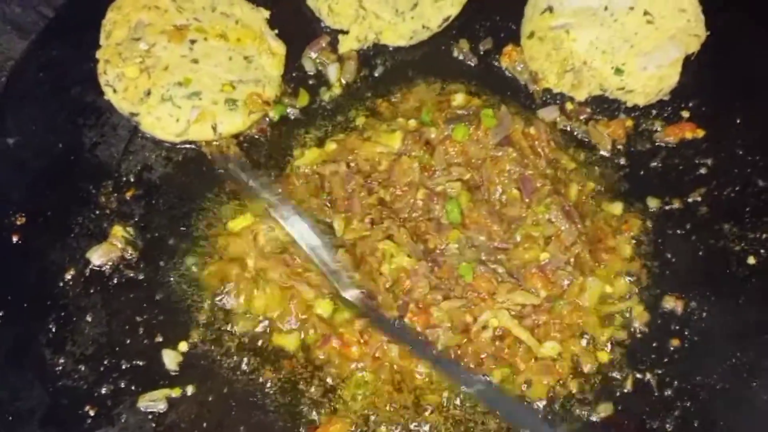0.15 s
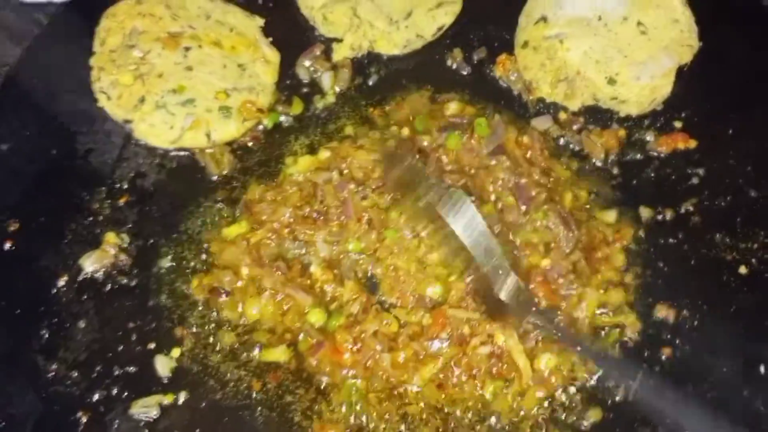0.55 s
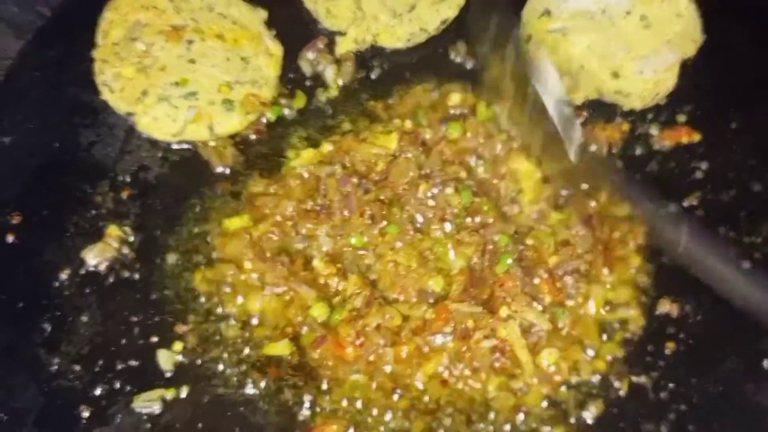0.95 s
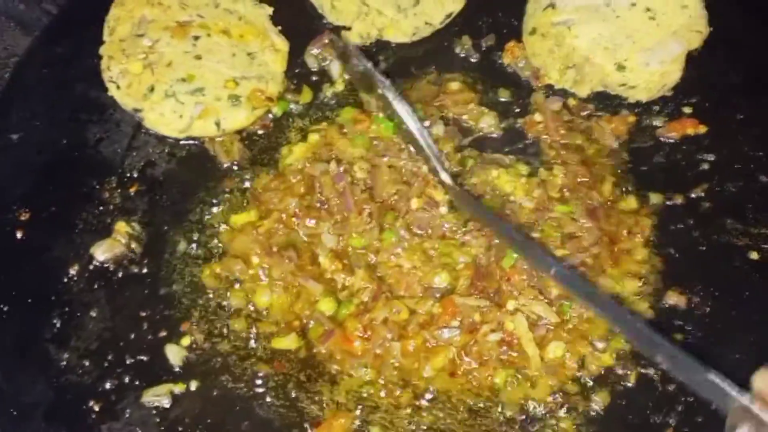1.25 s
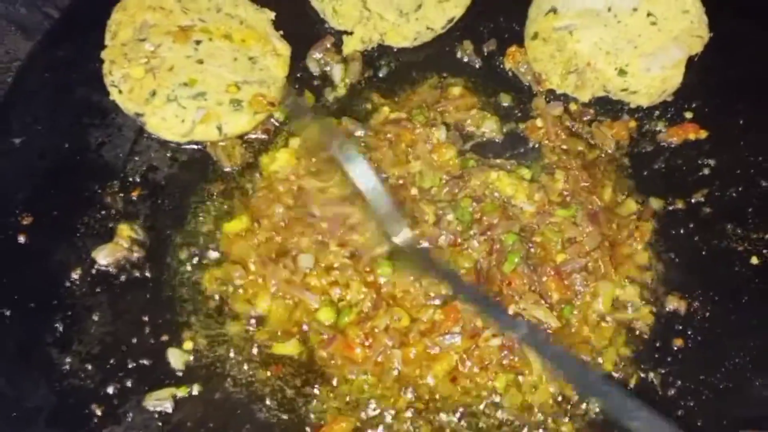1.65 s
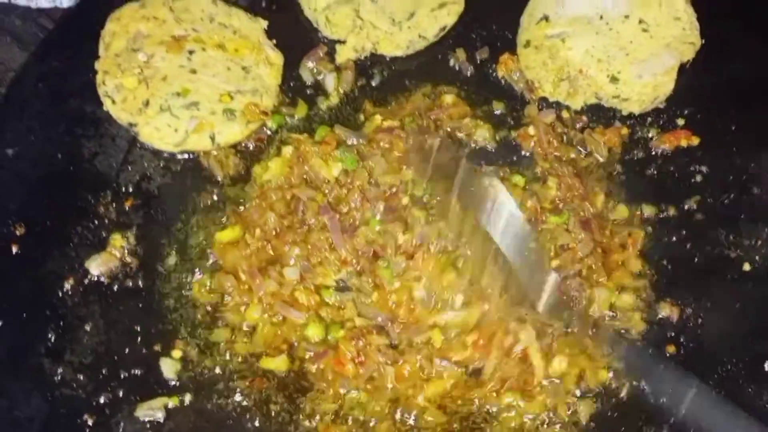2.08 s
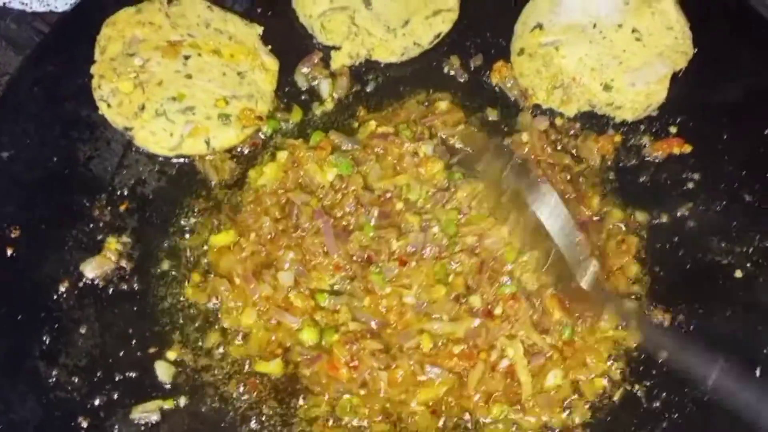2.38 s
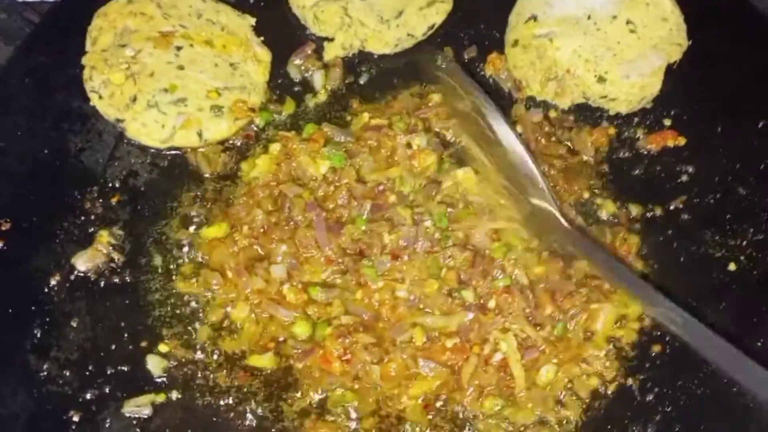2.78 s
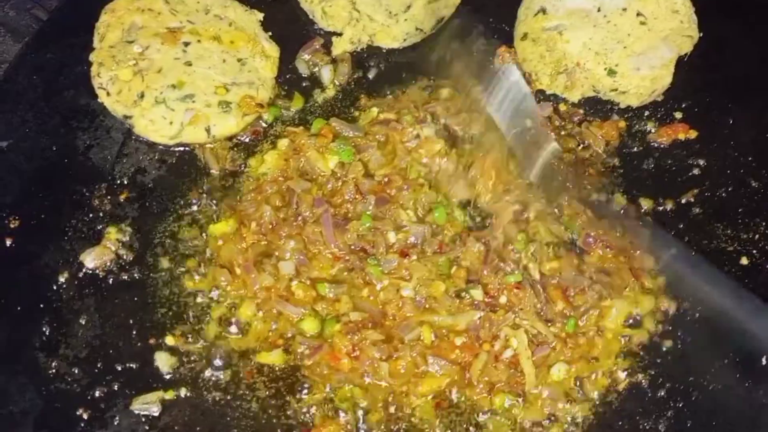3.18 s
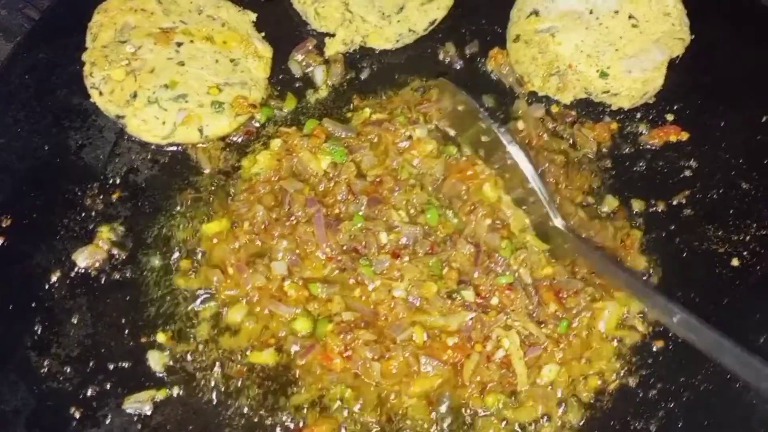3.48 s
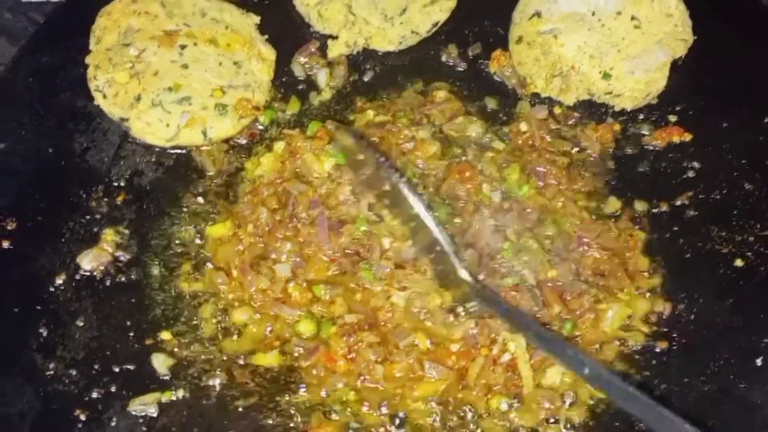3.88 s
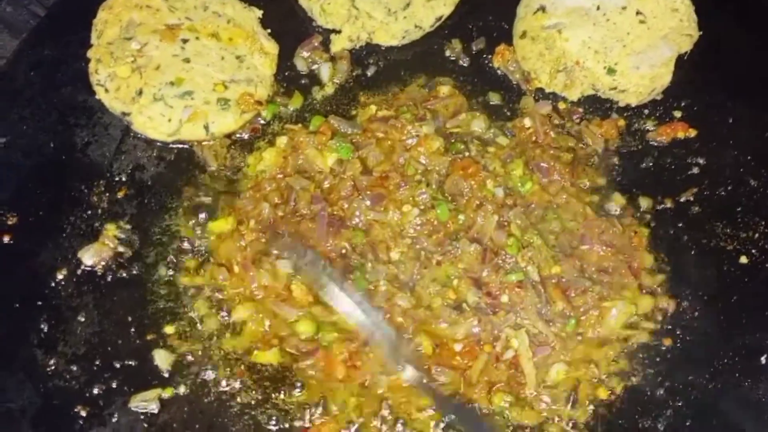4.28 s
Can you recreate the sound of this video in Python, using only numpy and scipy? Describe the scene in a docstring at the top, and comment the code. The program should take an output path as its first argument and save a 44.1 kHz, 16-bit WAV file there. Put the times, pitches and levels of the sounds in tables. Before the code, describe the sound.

A steel turner clanks and scrapes through frying food on a flat iron griddle, over soft sizzling and a steady rapid high chirp.

```python
"""By a street, a steel turner lands on a flat iron griddle and drags through frying masala in quick strokes:
impulses and friction grains excite a bank of damped modes. The food sizzles softly as shaped noise with
louder spits of oil, and an insect or small bird nearby chirps eight times a second in swept tones.
Thin wavering notes come from far off as gliding sines; a low hum, perhaps traffic, swells underneath
as an unsteady sine with a narrow band of noise."""
import sys
import numpy as np
from scipy import signal
from scipy.fft import rfft, irfft
from scipy.io import wavfile

SR = 44100
rng = np.random.default_rng(int(sys.argv[2]) if len(sys.argv) > 2 else 0)


def put_to_file(sound):
    """Save the sound as 16-bit audio at rate SR, in the file named by the first command-line argument."""
    columns = np.atleast_2d(sound).T  # one column per channel
    safe = np.clip(columns, -1, 1)
    whole_steps = np.round(safe * 32767)
    wavfile.write(sys.argv[1], SR, whole_steps.astype(np.int16))


N = 195451


def amp(db):
    """Decibel law: 20 dB is a factor of ten in amplitude."""
    return 10 ** (np.asarray(db) / 20)


def rms_one(x):
    """Power normalisation: the signal is scaled to rms 1."""
    return x / np.sqrt(np.mean(x ** 2) + 1e-20)


def along(rows):
    """Linear interpolation: first sample and the columns of a timed curve, sample by sample."""
    s, *columns = np.transpose(rows)
    first = max(round(s[0] * SR), 0)
    last = min(round(s[-1] * SR), N)
    t = np.arange(first, last) / SR
    return first, [np.interp(t, s, c) for c in columns]


def faded(x, fade_s):
    """Linear windowing: both ends ramp to silence."""
    k = np.arange(len(x))
    return x * np.clip(np.minimum(k, k[::-1]) / (fade_s * SR), 0, 1)


def band(x, lo_hz, hi_hz):
    """Butterworth band-pass filtering: flat inside the band, falling away on both sides."""
    return signal.sosfilt(signal.butter(2, [lo_hz, hi_hz], "band", fs=SR, output="sos"), x)


def drift(rate_hz):
    """Low-passed noise: a slow random fluctuation with rms 1."""
    r = np.exp(-2 * np.pi * rate_hz / SR)
    noise = rng.standard_normal(N + SR)
    # the first second lets the filter settle
    return rms_one(signal.lfilter([1], [1, -2 * r, r * r], noise)[SR:])


def grains(per_s, spread_db):
    """Shot noise: clicks of uneven size and random sign at random instants."""
    sizes = amp(spread_db * np.minimum(rng.exponential(1, N), 5)) * rng.choice([-1, 1], N)
    return rms_one(sizes * (rng.random(N) < per_s / SR))


def resonate(x, hz, width_hz):
    """Damped resonance: one two-pole mode with gain 1 at its peak."""
    r = np.exp(-np.pi * width_hz / SR)
    zeros = np.array([1, 0, -1]) * (1 - r * r) / 2
    poles = [1, -2 * r * np.cos(2 * np.pi * hz / SR), r * r]
    return signal.lfilter(zeros, poles, x + 1e-18)


def tail(x, t60_s):
    """Diffuse reverberation of nearby walls: convolution with noise that decays by 60 dB."""
    k = np.arange(round(t60_s * SR))
    echo = rng.standard_normal(len(k)) * amp(-60 * k / len(k))
    return signal.fftconvolve(x, echo / np.sqrt(np.sum(echo ** 2)))[:N]


# Course of the low hum. Each row: time in seconds, relative level in dB, centre of the wavering pitch in Hz.
HUM = [(0.0, -58, 69.8), (0.09, -78, 71.1), (0.39, -59, 64.6), (0.58, -78, 68.1), (0.79, -63, 61.9),
       (0.89, -84, 63.7), (1.01, -63.5, 62), (1.3, -65, 62.6), (1.52, -55, 63.35), (1.75, -69, 64.1),
       (1.98, -87, 76.6), (2.09, -57, 71.7), (2.16, -74, 74), (2.23, -58, 74), (2.38, -90, 64),
       (2.469, -66, 62.4), (2.6, -61, 71), (2.7, -85, 73.3), (2.92, -85, 76.6), (3.122, -56.5, 75.4),
       (3.31, -80, 78.8), (3.4, -67, 72.7), (3.5, -78, 72.6), (3.991, -95, 74), (4.09, -63, 64.4),
       (4.35, -69, 66.6), (4.43, -70.5, 64)]


def rumble():
    """Amplitude and frequency modulation: a low drone wavers in level and pitch beside narrow-band noise."""
    t = np.arange(N) / SR
    _, level_db, hz = [np.interp(t, np.array(HUM)[:, 0], c) for c in np.transpose(HUM)]
    wavering_hz = hz * (1 + 0.081 * drift(33))
    drone = np.sqrt(2) * np.sin(2 * np.pi * np.cumsum(wavering_hz) / SR)
    unsteady = drone * amp(2.2 * drift(29))
    noise = rms_one(band(rng.standard_normal(N), 56, 83))
    return amp(level_db) * (unsteady + 0.66 * noise)


# Spectrum of the sizzle and the street hush. Each row: frequency in Hz, relative spectral level in dB.
SIZZLE_COLOUR = [(60, -10), (130, -23), (250, -16), (700, -18.5), (900, -20), (1500, -13), (3200, -13.5),
                 (4200, -10), (5200, -7), (6000, 1), (8500, -5.5), (10500, -7.5), (12800, -25),
                 (14000, -21), (15200, -21.5)]
# Swell of the frying. Each row: time in seconds, relative level in dB.
FRYING_LEVEL = [(0.0, -48), (0.84, -45.5), (1.02, -49), (1.36, -44.5), (2.2, -48.5), (2.6, -45), (3.5, -46),
                (4.43, -47.5)]


def sizzle():
    """Superposition of bursting oil bubbles over the hush of the street: shaped noise, each band flickering."""
    fizz = rng.standard_normal(N)
    fizz = fizz + 0.47 * grains(1800, spread_db=4.5) + 0.24 * grains(60, spread_db=-1.5)
    hz = np.maximum(np.fft.rfftfreq(N, 1 / SR), 1)
    colour_hz, colour_db = np.transpose(SIZZLE_COLOUR)
    colour = amp(np.interp(np.log(hz), np.log(colour_hz), colour_db))
    spectrum = rfft(rms_one(irfft(rfft(fizz) * colour, N)))
    level_db = np.interp(np.arange(N) / SR, *np.transpose(FRYING_LEVEL))
    out, together = 0, drift(5.2)
    for octave in range(6, 15):   # overlapping bands centred on 2 ** octave Hz
        share = np.clip(1 - np.abs(np.log2(hz) - octave), 0, 1)
        oil = np.clip((octave - 9.5) / 1.7, 0, 1)   # only the upper bands follow the frying
        flicker_db = 1.1 * together + 1.6 * drift(14)
        gain_db = oil * level_db + (1 - oil) * level_db.mean() + 0.5 + flicker_db
        out = out + irfft(spectrum * share, N) * amp(gain_db)
    return out


# Louder spits of oil. Each row: start in seconds, relative level in dB, reference frequency of the band in Hz.
OIL_SPITS = [(0.489, -32, 3410), (0.616, -34, 12700), (1.244, -38.5, 4800), (1.4509, -48, 12500),
             (2.8975, -39, 12620), (3.715, -36, 4550)]


def spits():
    """Impulsive vaporisation: a drop of water bursts in the oil as a decaying puff of broad noise."""
    out, k = np.zeros(N), np.arange(round(.06 * SR))
    for s, level_db, hz in OIL_SPITS:
        puff = rng.standard_normal(len(k)) * np.exp(-k / SR / 0.018)
        puff = band(puff, 0.44 * hz, min(2.1 * hz, .45 * SR))
        out[round(s * SR) + k] += amp(level_db - 6.5) * puff
    return out


# Far wavering notes, each one glide. Each row: start, turning moment of the level and end in seconds,
# start and end pitch in Hz before wavering, relative level at the turn in dB, rise to the turn in dB,
# fall after it in dB (either may be negative), roughness as a plain factor.
FAR_NOTES = [(-.02, 0.0, 0.084, 2385, 2335, -34, 0, 20, 1.3),
             (-.02, -0.003, 0.22, 1350, 1497, -52.5, 3, 4, 1.2),
             (.3, .33, 0.38, 817, 790, -61, 3, 10, 0.61), (0.444, 0.539, 0.7, 1278, 1145, -56.5, 0, 8, 2),
             (0.722, 0.763, 0.81, 603, 604, -44, 3, 25, 1),
             (0.982, 1.187, 1.193, 1370, 1349, -41, 8, -2, 0.42),
             (1.201, 1.254, 1.65, 1323, 1290, -48.5, -4, 20, 1.1),
             (1.368, 1.5, 1.59, 1018, 1041, -42, 6.5, 27, 1.42),
             (1.364, 1.465, 1.62, 915, 917, -51, 9, 26, 1.7),
             (1.824, 1.866, 1.93, 1050, 1110, -48.5, 9, 22, 1.1),
             (1.98, 2.054, 2.11, 1210, 1347, -51.5, 13, 7, 1.4),
             (2.405, 2.462, 2.59, 1892, 2253, -38.5, 2, 6, 1.6),
             (2.51, 2.579, 2.68, 2240, 2300, -40.5, -3.5, 20, 1.12),
             (2.825, 2.891, 2.96, 804, 804, -65, 7, 5, 0.72),
             (3.08, 3.105, 3.15, 1180, 1200, -37, 9, 9, 0.57),
             (3.177, 3.222, 3.43, 1227, 1295, -48, 8, 5, 0.4),
             (3.551, 3.624, 3.70, 1044, 1137, -48, 0, 16, 0.99),
             (3.68, 3.732, 3.72, 1136, 1171, -48, 13, 19.5, 0.6),
             (3.788, 3.82, 4.16, 1113, 1120, -60, 0, 11, 1.5),
             (3.602, 3.72, 3.83, 598, 616.4, -59, 14, 6, .9), (3.806, 3.843, 3.96, 734, 727, -64, 3, 17, 1)]


def whistles():
    """Frequency modulation: near sines waver in pitch, and rough ones break up into a narrow band of noise."""
    out, waver, flutter = np.zeros(N), drift(34), drift(62)
    for start, turn, end, from_hz, to_hz, turn_db, rise_db, fall_db, rough in FAR_NOTES:
        _, (hz,) = along([(start, from_hz), (end, to_hz)])
        first, (level_db,) = along([(start, turn_db - rise_db), (turn, turn_db), (end, turn_db - fall_db)])
        here = slice(first, first + len(hz))
        tone = np.sin(2 * np.pi * np.cumsum(hz + 9 * rough * waver[here]) / SR)
        broken = (1 + 0.41 * rough * flutter[here]) / np.sqrt(1 + (0.77 * rough) ** 2)
        out[here] += faded(np.sqrt(2) * tone * broken * amp(level_db), 0.0047)
    return out + amp(-3.5) * tail(out, 0.31)


# Chirps in succession. Each row: start in seconds, relative level in dB.
CHIRP_TIMES = [(0.041, 0.5), (0.1701, 0), (0.3025, -1.5), (0.4315, -1.5), (0.5584, -0.5), (0.685, -2.5),
               (0.809, -6), (0.938, -1), (1.058, -2), (1.1853, -0.5), (1.312, -3.5), (1.442, -2.5),
               (1.566, -1.5), (1.692, -4), (1.818, -2), (1.944, -1.5), (2.0677, -2.5), (2.1957, -2),
               (2.3236, -7), (2.45, -2), (2.5748, -0.5), (2.7014, -1), (2.8327, -0.5), (2.961, 0),
               (3.088, 0.5), (3.2185, -11), (3.344, -1.5), (3.4726, -0.5), (3.6048, -1.5), (3.73, -1.5),
               (3.8558, -1.5), (3.9863, -0.5), (4.108, -1.5), (4.2354, 0), (4.366, -10)]
# One syllable dives and climbs back. Each row: time in seconds, nominal pitch in Hz, relative level in dB.
SWEEP = [(0.0, 6600, 9.5), (.002, 6550, 2), (.004, 6250, 1.5), (.008, 5820, -7.5), (.012, 5830, -18),
         (.016, 6000, 4), (.0175, 6360, 20)]
# Syllables of one chirp with their nearest reflections. Each row: delay in seconds, relative level in dB.
CHIRP_REPEATS = [(0.0, -32.5), (.0085, -34.5), (0.0214, -26), (.0265, -26), (.0365, -45), (.045, -39),
                 (.056, -48)]


def chirper():
    """Swept tone with discrete reflections: each repeat varies a little in pitch, timing and level."""
    out = np.zeros(N + SR)
    _, (hz, level_db) = along(SWEEP)
    chance = rng.normal(0, 1, (len(CHIRP_TIMES), len(CHIRP_REPEATS), 3))
    for (s, chirp_db), row in zip(CHIRP_TIMES, chance):
        for (delay, repeat_db), (bend, slip, swell) in zip(CHIRP_REPEATS, row):
            tone = np.sin(2 * np.pi * np.cumsum(hz * (1 + 0.006 * bend)) / SR)
            at = round((s + delay + 0.00019 * slip) * SR)
            uneven_db = 1.6 * swell
            gain = amp(level_db + repeat_db + chirp_db + uneven_db)
            out[at:at + len(hz)] += faded(tone * gain, 0.0026)
    return out[:N] + amp(-3) * tail(out[:N], 0.13)


# The blade lands, drags and lifts. Each row: landing in seconds, relative landing level in dB,
# brightness in dB, drag level in dB, drag time in seconds, lift rate in dB per second, edge bite in dB,
# plate weight in dB, edge sheen in dB, skid above the drag in dB, change of weight in the lift in dB.
BLADE_STROKES = [(0.0839, -8, -4.5, -30.5, 0.084, 228, -3.5, -14, -18.5, 3.5, -5),
                 (0.6493, -5.5, -11.5, -28, 0.069, 241, -9, -11.5, -21, 4.5, -5),
                 (0.8335, -6, -2.5, -31.5, .10, 170, -3.5, -10, -10, 6, -6),
                 (1.7242, -8, -15, -31, .07, 313, -5.5, -14.5, -23, 7.5, 4),
                 (2.125, -6.5, -0.5, -30, 0.096, 202, -4, -12, -21, 2.5, -9),
                 (2.3072, -7.5, -6, -30.5, 0.083, 182, -4, -13, -9, 6.5, 10),
                 (2.658, -9, -21, -32, 0.049, 193, -5, -12.5, -36, 10.5, -18),
                 (3.0414, -5.5, -21, -30.5, 0.024, 218, -6.5, -12.5, -48, 1.5, -12),
                 (3.2273, -5, -4.5, -29, 0.087, 141, -6.5, -14.5, -15.5, 6.5, -1),
                 (3.407, -6.5, -2, -29, 0.093, 197, -5, -14, -16, 2.5, -14),
                 (4.1599, -11, -3.5, -30, 0.077, 235, -4.5, -14.5, -22, 4.5, 11),
                 (4.3618, -6, 0, -35.5, 0.11, 200, -2, -17.5, -10, 2, -3)]
# Dull knocks through food. Each row: time in seconds, relative level in dB, softness cutoff in Hz,
# shuffle decay in seconds, graze of the plate in dB.
FOOD_BUMPS = [(.281, -31, 443, 0.029, -45.5), (0.459, -65, 300, 0.016, -60), (1.521, -30, 450, 0.029, -46),
              (1.931, -32.5, 230, 0.015, -78), (2.481, -30.5, 394.5, 0.025, -39.5),
              (2.842, -51, 305, 0.014, -70), (3.97, -44, 245, 0.023, -70)]
SETTLE_S = 0.031   # the blade skids brightly after landing, then settles into the drag
SKID_BITE_DB, SKID_WEIGHT_DB, SKID_SHEEN_DB = 5.5, -2.5, 12.5   # at the landing
PRESS_DB_PER_S = 8   # pressure builds a little during the drag
LIFT_DEPTH_DB, LIFT_BITE_DB, LIFT_SHEEN_DB = 28.5, -8.5, -2   # by the end of the lift
GRAZE_S, GRAZE_FADE_DB = 0.14, 52
GRAZE_COLOUR_DB = -8, -6, -6   # bite, weight, sheen
DIP_S = 0.0059   # the drag fades briefly to silence just before each landing


def contact():
    """Contact force and friction colour: a skid, drag and lift for each stroke, a short graze for each knock."""
    curves = []
    for s, _, bright, drag, hold, lift, bite, weight, sheen, skid, unweight in BLADE_STROKES:
        curves.append([
            (s, drag + skid, bite + SKID_BITE_DB, weight + SKID_WEIGHT_DB, bright + SKID_SHEEN_DB),
            (s + SETTLE_S, drag, bite, weight, sheen),
            (s + max(hold, SETTLE_S + .001), drag + PRESS_DB_PER_S * hold, bite, weight, sheen),
            (s + hold + LIFT_DEPTH_DB / lift, drag - LIFT_DEPTH_DB,
             bite + LIFT_BITE_DB, weight + unweight, sheen + LIFT_SHEEN_DB)])
    for s, *_, graze in FOOD_BUMPS:
        curves.append([(s, graze, *GRAZE_COLOUR_DB), (s + GRAZE_S, graze - GRAZE_FADE_DB, *GRAZE_COLOUR_DB)])
    out = np.zeros((4, N))
    for rows in curves:
        first, (level_db, *colour) = along(rows)
        here = slice(first, first + len(level_db))
        touch = np.array([faded(amp(level_db), 0.00023), *colour])
        out[:, here] = np.where(touch[0] > out[0, here], touch, out[:, here])   # the firmer contact wins
    for s, *_ in BLADE_STROKES:
        first, (left,) = along([(s - 2 * DIP_S, 1), (s - DIP_S, 0), (s, 0)])
        out[0, first:first + len(left)] *= left
    return out


def food_knocks():
    """Cushioned impact: food pads the contact, so only the lows of each push pass."""
    knocks, k = np.zeros(N), np.arange(round(.2 * SR))
    for s, level_db, soft_hz, shuffle_s, _ in FOOD_BUMPS:
        push = amp(-28) * np.exp(-k / SR / shuffle_s) * rng.standard_normal(len(k))
        push[0] += 1
        cushion = signal.butter(5, soft_hz, fs=SR, output="sos")
        knocks[round(s * SR) + k] += amp(level_db + 57.5) * signal.sosfilt(cushion, push)
    return knocks


# Modes of turner and griddle together. Each row: frequency in Hz, bandwidth in Hz, relative level in dB.
MODES = [(236.8, 30, -19), (304.6, 9.4, -12.5), (393, 27, -11), (474, 35, -17), (613, 63, -18.5),
         (794, 51, -17), (884, 180, -21.5), (1200.6, 124, -5), (1261, 62, -5), (1385, 32.5, 3),
         (1397, 75, -1.5), (1441.5, 27.8, 1), (1560, 90, -5), (1683, 108, -8), (1866, 97, -10),
         (2027, 64, -7.5), (2511, 214, -10), (2967, 82, -11), (3110, 194, -15), (3773, 100, -9.5),
         (4085, 93, -13), (4558, 153, -11.5), (5497, 180, -12), (6390, 180, -13.5), (7020, 53, -18),
         (7380, 58, -13.5), (8553, 80, -17), (9624, 110, -18.5), (10540, 340, -84), (11400, 220, -34)]
THUD_DB, THUD_HZ, THUD_WIDTH_HZ = 8.5, 215, 110   # the whole plate gives under a landing


def turner():
    """Modal superposition: friction grains, landings and knocks all drive the same resonances."""
    force, bite_db, weight_db, sheen_db = contact()
    # the edge catches on the rough iron thousands of times a second, in small judders
    friction = force * grains(6000, spread_db=3.0) * amp(0.5 * drift(66))
    landing_s, land_db, bright_db = np.transpose(BLADE_STROKES)[:3]
    landing = np.round(landing_s * SR).astype(int)
    scatter = rng.normal(0, 1, (len(landing), len(MODES)))
    knocks = food_knocks()
    # as the contact point travels, each mode is driven more or less
    travel = rng.normal(0, 1, (len(MODES), N // 3000 + 2))
    out = 0
    for m, (hz, width_hz, level_db) in enumerate(MODES):
        high = np.clip(np.log2(hz / 2000) / 0.24, 0, 1)   # share of the edge bite
        top = np.clip(np.log2(hz / 5500) / 1.44, 0, 1)   # share of the sheen
        low = np.clip(np.log2(1150 / hz) / .3, 0, 1)   # share of the plate weight
        tilt_db = (high - top) * (bite_db + 5) + top * (sheen_db + 13.5) + low * (weight_db + 15.5)
        moving_db = 2.79 * np.interp(np.arange(N) / 3000, np.arange(travel.shape[1]), travel[m])
        drive = friction * amp(20.5 + tilt_db + moving_db) + knocks
        hit_db = land_db + 30.5 + 3.95 * scatter[:, m] - 1.15 * low
        hit_db = hit_db + high * 0.35 * bright_db + top * (0.54 * bright_db + 2.0)
        drive[landing] += amp(hit_db)
        # alternating signs keep neighbouring modes from cancelling between their peaks
        out = out + (-1) ** m * amp(level_db) * resonate(drive, hz, width_hz)
    # the first contact is a short broad crack
    crack = np.zeros(N)
    crack[landing] = amp(land_db - 1.5 + 2.8 * bright_db)
    crack = signal.lfilter([1], [1, -np.exp(-1 / (.0045 * SR))], crack) * rng.standard_normal(N)
    # unresolved modes fill the gaps
    fill = amp(-11.5) * band(friction, 480, 3800)
    fill = fill + amp(-9.0) * band(friction * amp(bite_db), 2500, 3700)
    fill = fill + amp(-1) * band(friction * amp(sheen_db), 5200, 11700)
    thud = np.zeros(N)
    thud[landing] = amp(land_db + THUD_DB)
    thud = resonate(resonate(thud, THUD_HZ, THUD_WIDTH_HZ), THUD_HZ, 2 * THUD_WIDTH_HZ)
    # a thick plate radiates no deep bass
    no_bass = signal.butter(3, 160, "high", fs=SR, output="sos")
    return thud + signal.sosfilt(no_bass, out + band(crack, 1450, 7500) + fill)


def scene():
    """Linear superposition: every source adds at one microphone, the steel with its reverberation."""
    background = rumble() + sizzle() + spits() + whistles() + chirper()
    steel = turner()
    return (background + steel + amp(-8.0) * tail(steel, 0.22))[None]


def record(dry):
    """Microphone response: a dip, then a resonance near the top of the band, and a treble cut above it."""
    port = dry - .7 * resonate(dry, 12900, 3000) + 2.2 * resonate(dry, 15150, 900)
    # the stopbands begin at 15720 Hz, 32 dB down, and at 16672 Hz, a further 70 dB down
    soft = signal.sosfilt(signal.cheby2(18, 32, 15720, fs=SR, output="sos"), port)
    return signal.sosfilt(signal.cheby2(12, 70, 16672, fs=SR, output="sos"), soft)


dry = scene()
out = record(dry)
put_to_file(out)
```